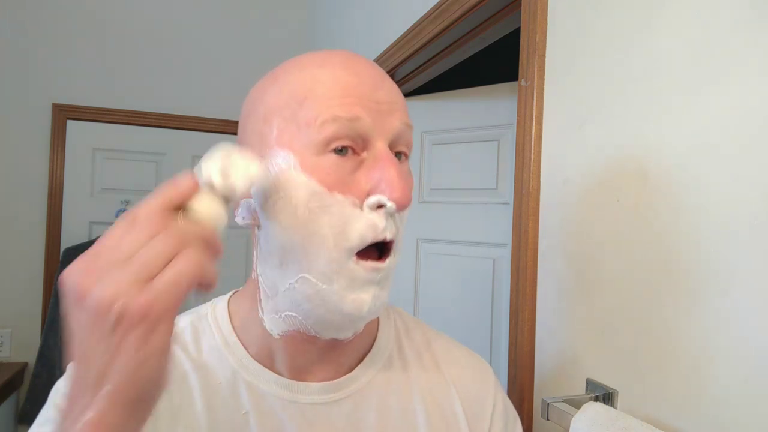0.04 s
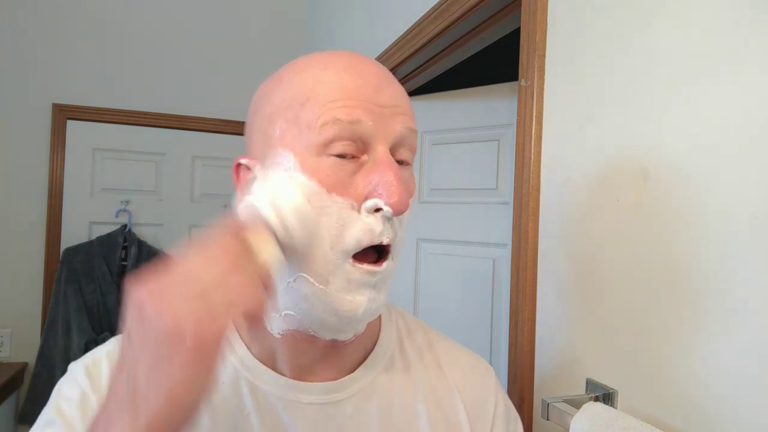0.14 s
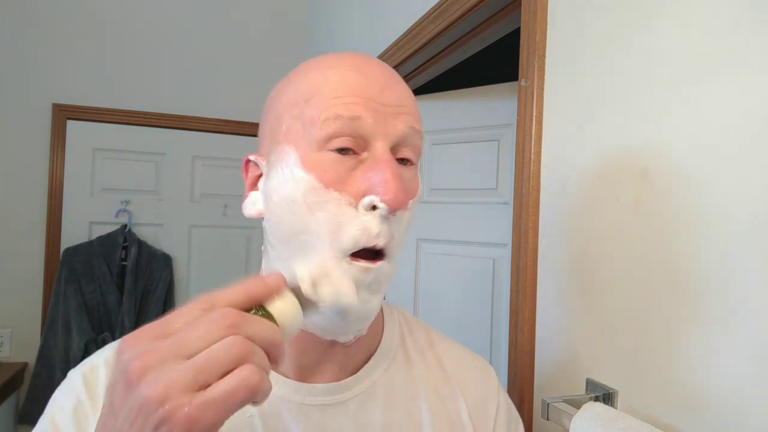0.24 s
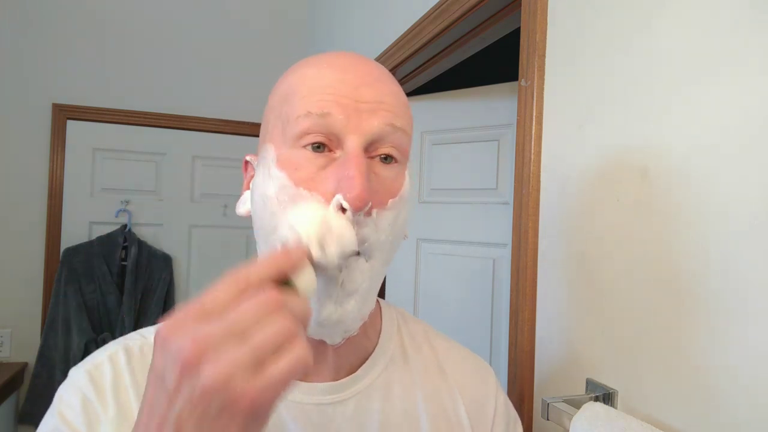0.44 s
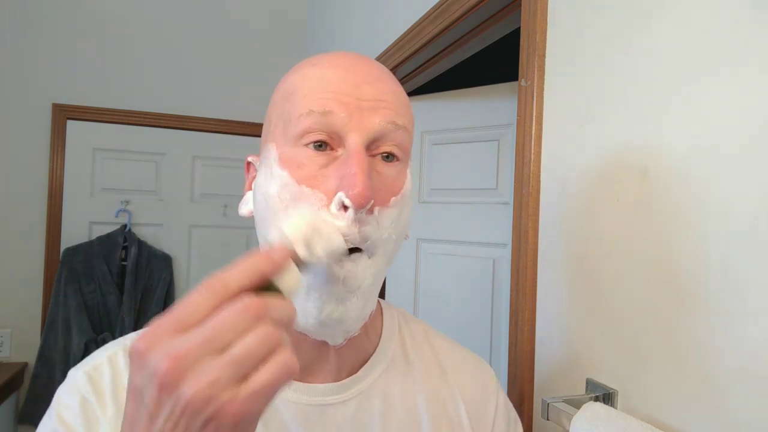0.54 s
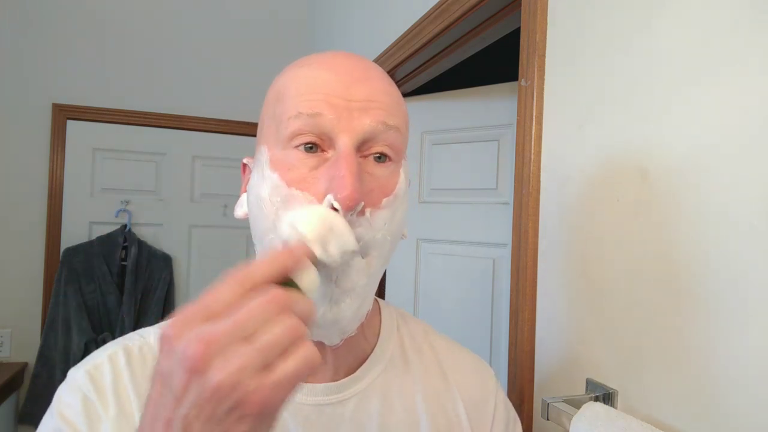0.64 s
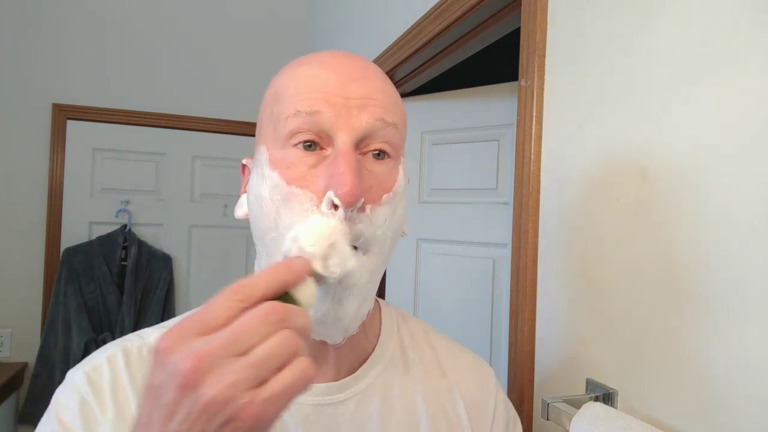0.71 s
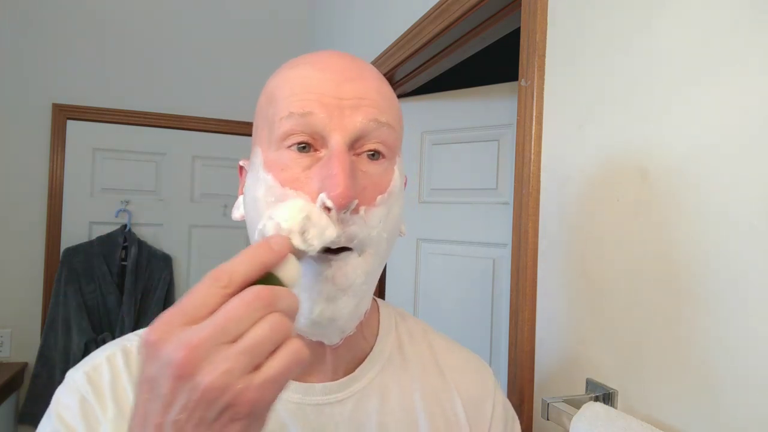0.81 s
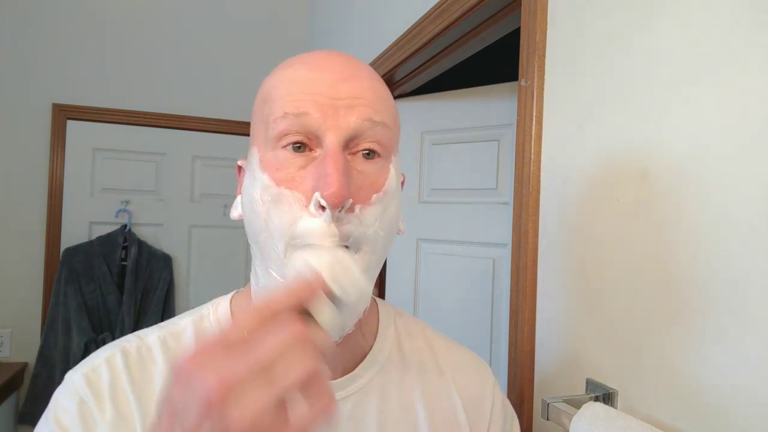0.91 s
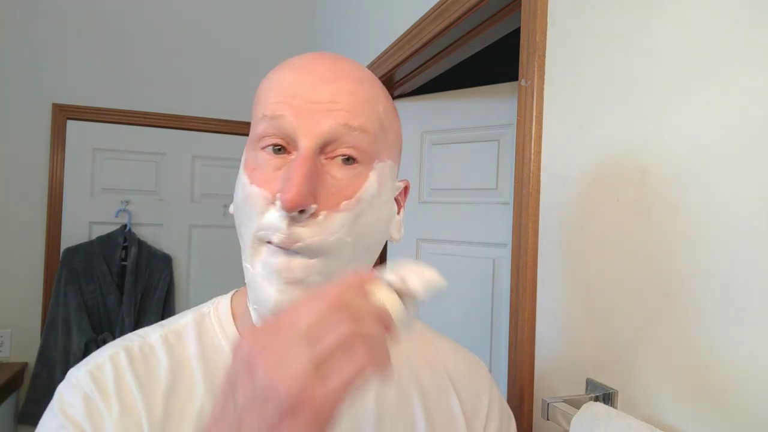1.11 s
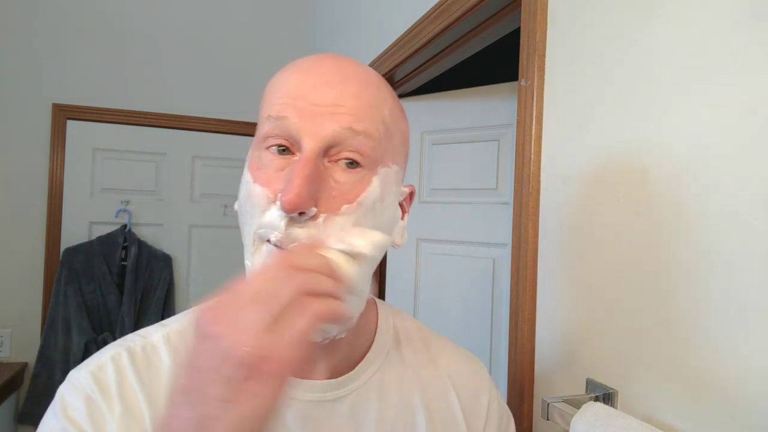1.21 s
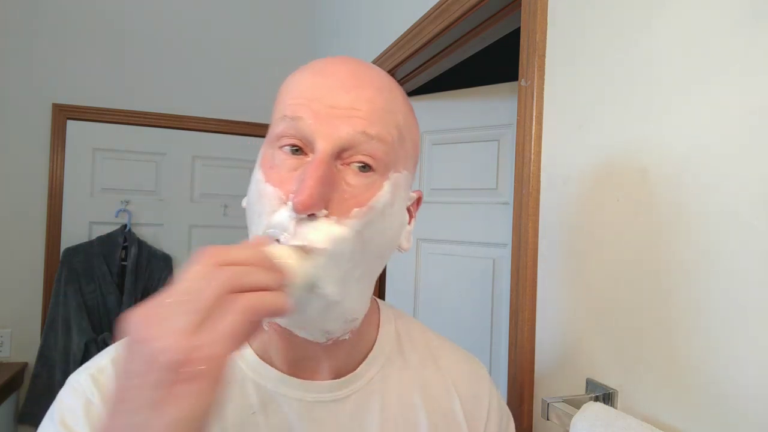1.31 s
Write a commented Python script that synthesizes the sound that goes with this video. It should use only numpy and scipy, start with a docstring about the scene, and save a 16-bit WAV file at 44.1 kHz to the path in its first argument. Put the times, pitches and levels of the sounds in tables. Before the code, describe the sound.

Close by, a foamy brush slaps skin once strongly, with hollow bristle rubs around it, then gentler taps fade away and a last faint swipe follows; lively small bathroom, quiet hiss and hum.

```python
"""Wet shaving brush in a bathroom

A brush slaps and drags lather over a face. Each slap is a soft cycle of air squeezed from under the
bristles, ringing the face; noise bursts splash foam; random slips drag; clicks and sines burst bubbles.
Close echoes, a gap, then dense taps and standing waves answer. Low hum and soft hiss fill the room.
"""
import sys
import numpy as np
from scipy import signal
from scipy.fft import rfft, irfft
from scipy.io import wavfile

SR = 44100
rng = np.random.default_rng(int(sys.argv[2]) if len(sys.argv) > 2 else 0)


def nominal_scale(level):
    """Amplitude ratio for a level in decibels (scalar or array-like)."""
    x = np.asarray(level, float) / 20
    return 10 ** x


def generate_wav(sig):
    """Save sig (samples, or channels by samples) to the path in sys.argv[1] as 16-bit PCM at SR."""
    pcm = np.round(np.clip(np.atleast_2d(sig).T, -1, 1) * 32767).astype(np.int16)
    wavfile.write(sys.argv[1], SR, pcm)


N = 59535
LEAD_S = 0.2  # rendered before zero, so that an earlier slap still rings

# hiss spectrum, before a high-pass: [f/Hz, relative level/dB]
HISS_SPECTRUM = [(15, -63), (25, -46), (58, -15), (114, -3), (223, -9), (277, -10.5), (335, -9),
                 (405, -21.5), (439, -19), (887, -20.5), (3340, -29), (4030, -27), (16000, -36)]
# weaker low tones: [f/Hz, width of each of two passes/Hz, rms level/dB]
WEAK_HUMS = [(113.6, 9.5, -69.5), (53.7, 24, -69)]
# strongest low tone: [t/s, level/dB]
HUM_SWELL = [(0.0, -66), (0.078, -71), (0.83, -59.5), (0.962, -65), (1.0, -60.5), (1.146, -61),
             (1.312, -63), (1.35, -59)]
# mirror and sink: [delay/s, level over direct/dB]
NEAR_ECHOES = [(.004, -13), (.0075, -15)]
# wall reverberation: [f/Hz, t60/s]
WALL_DECAY = [(200, 0.3), (400, 0.65), (600, 0.61), (1400, 0.6), (3700, 0.58), (9700, 0.34), (14000, 0.45)]
# wall reverberation colour: [f/Hz, gain/dB]
WALL_COLOUR = [(200, 1), (420, -3), (800, -6), (1300, -4.5), (1700, 2), (2500, -3), (6000, 1), (9000, 0),
               (14000, 1.5)]
# standing waves of the small room: [f/Hz, level/dB, t60/s]
ROOM_MODES = [(320.4, -49.5, 0.37), (350.5, -47, 0.26), (381.7, -52, 0.63), (414.2, -54, 0.61),
              (492, -54, 0.4), (560.7, -55.5, 0.35), (585, -54, 0.28), (631.4, -47.5, 0.26)]
# many small bubbles: [t/s, level/dB]
FIZZ_LEVEL = [(0, -76.5), (.3, -79.5), (.6, -80.5), (.75, -79), (.95, -77), (1.052, -78.5), (1.132, -98),
              (1.35, -76.5)]
# single foam bubbles bursting: [t/s, level before onset/dB, f/Hz, t60/s]
BUBBLES = [(0.679, -64.5, 8700, 0.012), (0.6802, -61, 12400, 0.0037), (0.686, -53, 5800, 0.013),
           (0.7457, -62, 8700, 0.0052), (.9950, -53, 7050, 0.0022)]
# bristle drags: [start/s, length before fall/s, hollow tone level/dB, rub over tone/dB]
DRAGS = [(0.111, 0.31, -61, -5), (0.388, 0.15, -60.5, -6.5), (1.237, 0.085, -62, -3.5)]
# hollow cheek tone: [f/Hz, width of first pass (second is double)/Hz, relative level/dB]
CHEEK = [(1112, 77, 15.5), (1300, 69, -9)]
# dull rub of skin: [f/Hz, width of first pass (second is double)/Hz, relative level/dB]
SKIN_RUB = [(328, 164, -0.5), (520, 262, 12), (795, 180, 8)]
# foam thrown off by slaps: [t/s, peak level/dB, centre f/Hz, half-width at half amplitude/octaves]
SPLASHES = [(-.06, -31, 2320, 1.0), (.2366, -34, 5800, 0.53), (.2370, -38.5, 11600, 1),
            (.2400, -32.5, 2900, 0.82), (.5424, -40.5, 2780, 1), (.5430, -53.5, 11220, .6),
            (.5462, -77, 4500, 0.48), (.7700, -55, 2040, 0.39), (.7715, -54, 6900, 0.31),
            (1.339, -66, 2470, 0.13)]
# air squeezed from under bristles: [t/s, snap peak level/dB, snap f/Hz, face ring over snap/dB]
SLAPS = [(-.06, -24, 850, -36), (.2384, -22.5, 799, -1), (.5433, -36, 695, -37), (.7706, -36, 680, -42.5),
         (.9757, -49, 730, -5)]
# face modes set ringing by a slap: [f/Hz, time to fall 63 dB/s, relative peak level/dB]
FACE_MODES = [(251, 0.0165, -4.5), (444.5, 0.045, 1), (1340, 0.0059, -1.5)]


def evened(x):
    """Scales to an rms of one."""
    return x / np.sqrt(np.mean(x ** 2) + 1e-20)


def read(points, hz):
    """Interpolates a table on a log-frequency axis."""
    f, value = np.transpose(points)
    return np.interp(np.log(hz + 1), np.log(f + 1), value)


def add(mix, start_s, sound):
    """Mixes a sound in at start_s, in place."""
    part = mix[round((start_s + LEAD_S) * SR):][:len(sound)]
    part += sound[:len(part)]


def resonate(x, hz, width_hz):
    """Two-pole resonance; the pole radius sets the bandwidth."""
    r = np.exp(-np.pi * width_hz / SR)
    return signal.lfilter([1, 0, -1], [1, -2 * r * np.cos(2 * np.pi * hz / SR), r * r], x)


def ring(t, hz, t60):
    """Exponentially dying sine."""
    return np.sin(2 * np.pi * hz * t) * nominal_scale(-60 * t / t60)


def grains(size, per_s, spread_db):
    """Sparse clicks of random sign, a few of them large."""
    hit = rng.random(size) < per_s / SR
    excess = np.minimum(rng.exponential(1, size), 4)
    return hit * rng.choice([-1., 1.], size) * nominal_scale(spread_db * excess)


def coloured(points, size):
    """Noise with the given spectrum, rms one."""
    hz = np.fft.rfftfreq(size, 1 / SR)
    spectrum = rfft(rng.standard_normal(size)) * nominal_scale(read(points, hz))
    return evened(irfft(spectrum, size))


def waver(hz, width_hz):
    """Noise passed twice through a narrow resonance: a wavering tone, rms one."""
    noise = rng.standard_normal(N + SR)
    tone = resonate(resonate(noise, hz, width_hz), hz, width_hz)
    return evened(tone[SR:])  # filter onset dropped


def hiss():
    """Soft steady hiss: coloured noise, high-passed."""
    high_pass = signal.butter(2, 140, "high", fs=SR, output="sos")
    rms_db = -66.5
    return nominal_scale(rms_db) * evened(signal.sosfilt(high_pass, coloured(HISS_SPECTRUM, N)))


def hum():
    """Low tones of narrow-band noise; the strongest swells."""
    swell = nominal_scale(np.interp(np.arange(N) / SR, *np.transpose(HUM_SWELL)))
    strongest = swell * waver(88.7, 15)
    return strongest + sum(nominal_scale(db) * waver(hz, width_hz) for hz, width_hz, db in WEAK_HUMS)


def bathroom(x):
    """Two close echoes, a gap, then dense taps dying band by band over the standing waves."""
    walls_db, gap_s, rise_s = -0.5, 0.011, 0.006
    taps = np.zeros(SR)
    at = np.arange(0, SR - 20, 20)
    taps[at + rng.integers(0, 20, len(at))] = rng.choice([-1., 1.], len(at))
    hz, t, bands = signal.stft(taps, SR, nperseg=256)
    bands = bands * nominal_scale(-60 * t / read(WALL_DECAY, hz)[:, None])
    norm = np.linalg.norm(signal.istft(bands, SR, nperseg=256)[1])  # before colour
    bands = bands * nominal_scale(read(WALL_COLOUR, hz))[:, None]
    walls = signal.istft(bands, SR, nperseg=256)[1][:SR]
    t = np.arange(len(walls)) / SR
    modes = sum(nominal_scale(db) * ring(t + rng.random() / f, f, t60) for f, db, t60 in ROOM_MODES)
    response = (walls * nominal_scale(walls_db) / norm + modes) * np.clip((t - gap_s) / rise_s, 0, 1)
    response[0] = 1  # direct sound
    for delay_s, db in NEAR_ECHOES:
        response[round(delay_s * SR)] += nominal_scale(db)
    return signal.fftconvolve(x, response)[:len(x)]


def foam(size):
    """Fine fizz of resonated clicks; single bubbles burst as short dying sines."""
    per_s, fizz_hz, width_hz = 2700, 8700, 1670  # width of each of two passes
    clicks = grains(size, per_s, 3.0)
    fizz = resonate(resonate(clicks, fizz_hz, width_hz), fizz_hz, width_hz)
    level = nominal_scale(np.interp(np.arange(size) / SR - LEAD_S, *np.transpose(FIZZ_LEVEL)))
    out = level * evened(fizz)
    t = np.arange(1500) / SR
    onset = 1 - np.exp(-t / 0.00029)
    for start_s, db, hz, t60 in BUBBLES:
        add(out, start_s, nominal_scale(db) * onset * ring(t, hz, t60))
    return out


def body(slips, modes):
    """Resonances of cheek or skin driven by bristle slips, rms one."""
    out = 0
    for hz, width_hz, db in modes:
        tone = resonate(resonate(slips, hz, width_hz), hz, 2 * width_hz)
        out = out + nominal_scale(db) * evened(tone)
    return evened(out)


def drag(start_s, length_s, db, rub_db):
    """Quick bristle slips sound through the hollow cheek and the skin."""
    slips_per_s, rise_s, fall_s = 1500, 0.018, 0.016  # fall: time constant
    t = np.arange(0, length_s + 4 * fall_s, 1 / SR)
    slips = grains(len(t), slips_per_s, 2.0)
    shape = np.minimum(t / rise_s, 1) * np.exp(-np.maximum(t - length_s, 0) / fall_s)
    sound = body(slips, CHEEK) + nominal_scale(rub_db) * body(slips, SKIN_RUB)
    return start_s, nominal_scale(db) * shape * sound


def splash(start_s, db, hz, octaves):
    """Short spatter of droplets: shaped noise, spectrum flattened, then one broad band."""
    t = np.arange(-64, 1984) / SR
    rise_s, shape_t60_s = 0.0012, 0.022
    shape = np.clip(1 + t / rise_s, 0, 1) * nominal_scale(-60 * np.maximum(t, 0) / shape_t60_s)
    drops = rfft(rng.standard_normal(len(t)) * shape)
    away = np.log2((np.fft.rfftfreq(len(t), 1 / SR) + 1) / hz) / octaves
    # unit magnitudes, phases kept; the root of the shape trims the smear
    wet = irfft(drops / abs(drops) / (1 + away ** 4)) * np.sqrt(shape)
    return start_s + t[0], nominal_scale(db) * wet / abs(wet).max()


def slap(start_s, db, snap_hz, ring_db):
    """One soft cycle of squeezed air, which sets the face ringing."""
    sigma_cycles = 0.34  # Gaussian envelope
    t = np.arange(-200, 2048) / SR
    envelope = np.exp(-.5 * (t * snap_hz / sigma_cycles) ** 2)
    snap = -np.sin(2 * np.pi * snap_hz * t) * envelope
    face = 0
    for hz, fall_s, mode_db in FACE_MODES:
        mode = resonate(snap, hz, 2.32 / fall_s)
        face = face + nominal_scale(mode_db) * mode / abs(mode).max()
    return start_s + t[0], nominal_scale(db) * (snap / abs(snap).max() + nominal_scale(ring_db) * face)


def scene():
    """Brush and foam in the bathroom over hiss and hum."""
    size = N + round(LEAD_S * SR)
    brush = foam(size)
    for rows, source in ((SLAPS, slap), (SPLASHES, splash), (DRAGS, drag)):
        for row in rows:
            add(brush, *source(*row))
    return (bathroom(brush)[-N:] + hiss() + hum())[None]


def band_limit(x):
    """A steep low-pass at the top of the band."""
    return signal.sosfilt(signal.butter(12, 16290, fs=SR, output="sos"), x)


def record(dry):
    """Linear-phase low-pass limits the band."""
    edge_hz = 16050
    low_pass = signal.firwin(511, edge_hz, window=("kaiser", 9), fs=SR)[None]
    mix = signal.oaconvolve(dry, low_pass, "same")
    return band_limit(mix)


dry = scene()
out = record(dry)
generate_wav(out)
```